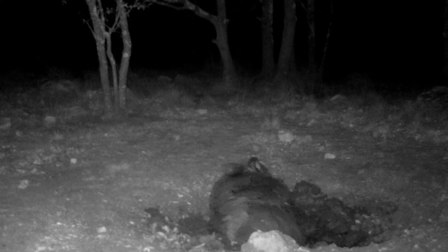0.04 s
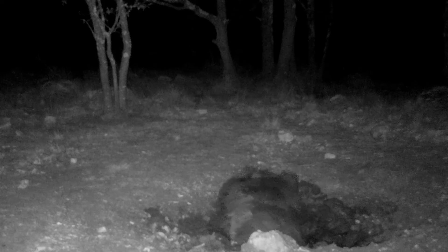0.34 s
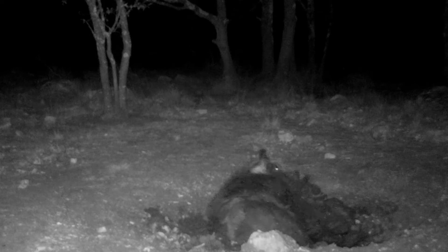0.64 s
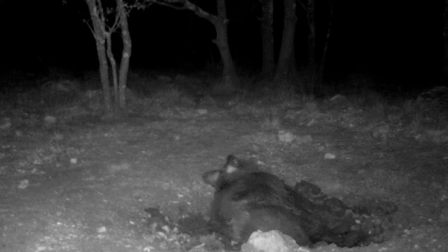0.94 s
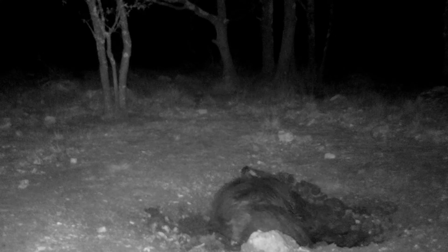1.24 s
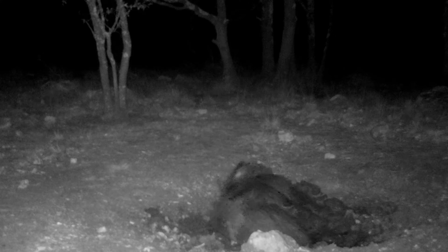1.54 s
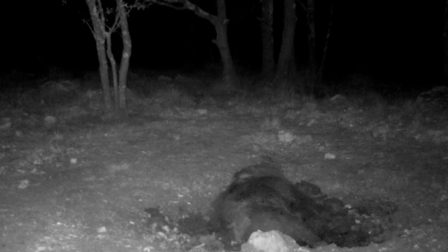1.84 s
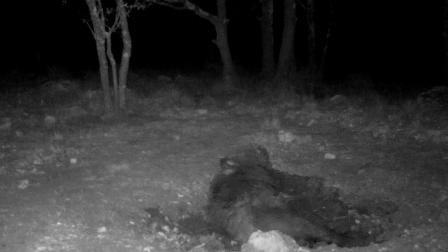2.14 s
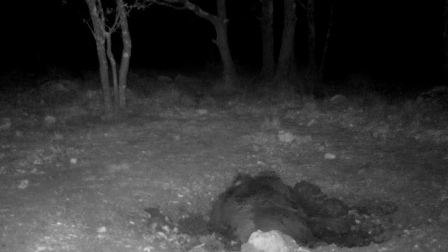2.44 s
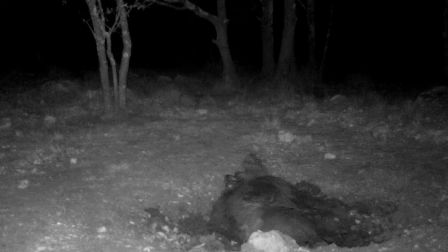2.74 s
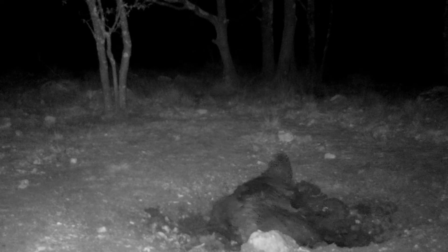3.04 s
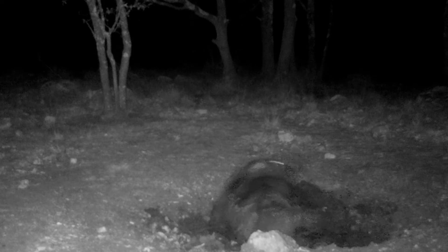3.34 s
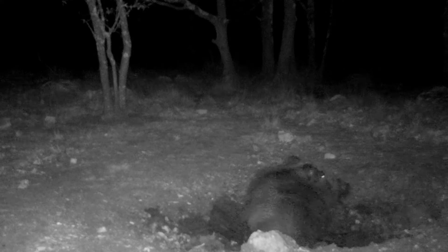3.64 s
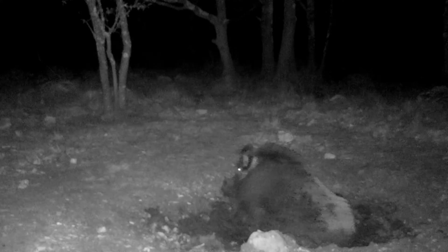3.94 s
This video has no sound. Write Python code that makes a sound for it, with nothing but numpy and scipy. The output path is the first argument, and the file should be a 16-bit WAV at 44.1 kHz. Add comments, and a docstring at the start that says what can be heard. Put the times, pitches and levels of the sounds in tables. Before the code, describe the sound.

Wet mud squelches and smacks as a wild boar rolls in it, over steady hiss.

```python
"""A clearing at night: a wild boar rolls in a mud wallow, a few metres from a trail camera.
Its flank rubs through the mud in small jerks, and each push squeezes out a squelch of tiny air
pockets that burst as damped resonators. Suction lets go in sharp smacks and bubbles plop, over a
faint low rumble. The camera hisses, whines and stops just before the end."""
import sys
import numpy as np
from scipy import signal
from scipy.fft import rfft, irfft, next_fast_len
from scipy.io import wavfile
from scipy.ndimage import map_coordinates

SR = 44100
rng = np.random.default_rng(int(sys.argv[2]) if len(sys.argv) > 2 else 0)


def file_out(sig):
    """Save sig as 16-bit WAV at sys.argv[1]."""
    # one column per channel
    cols = np.atleast_2d(sig).T
    # limit, then scale
    lim = np.clip(cols, -1, 1)
    pcm = np.round(lim * 32767).astype(np.int16)
    wavfile.write(sys.argv[1], SR, pcm)


N = 176400
T = np.arange(N) / SR
OPEN_CYCLES = .38  # time constant of a cavity's onset, in periods


def amp(db):
    """Amplitude ratio of a level in decibels."""
    return 10 ** (np.asarray(db) / 20)


def unit(x):
    """Normalisation to rms 1."""
    return x / np.sqrt(np.mean(x ** 2) + 1e-20)


def add(track, start_s, sound):
    """Superposition of a sound on a track."""
    i = max(0, round(start_s * SR))
    track[i:i + len(sound)] += sound[:max(0, N - i)]


def colour(x, points):
    """Minimum-phase filtering through (frequency [Hz], gain [dB]) points."""
    m = 2 * next_fast_len(N)
    hz, db = np.transpose(points)
    gain = amp(np.interp(np.log(np.fft.rfftfreq(m, 1 / SR) + 1), np.log(hz), db))
    cepstrum = irfft(np.log(gain + 1e-6))
    cepstrum[1:m // 2] *= 2
    cepstrum[m // 2 + 1:] = 0
    return irfft(rfft(x, m) * np.exp(rfft(cepstrum)))[:N]


def wobble(knots_per_s):
    """Smooth random modulation by spline interpolation."""
    return map_coordinates(rng.standard_normal(int(N * knots_per_s / SR) + 4), [T * knots_per_s])


def band_noise(n, low_hz, high_hz):
    """Band-limited Gaussian noise of rms 1."""
    bandpass = signal.butter(2, [low_hz, min(high_hz, .45 * SR)], 'band', fs=SR)
    return unit(signal.lfilter(*bandpass, rng.standard_normal(n)))


def pockets(n, per_s, hz, spread, cycles, scatter_db):
    """Shot noise of rms 1: air pockets burst at random, each a damped resonator of its own pitch."""
    when, size, pitch, life = rng.random((int(per_s * n / SR) + 2, 4)).T
    ring_hz = np.clip(hz * np.exp(spread * np.log(pitch / (1 - pitch)) / 2), 200, 13000)[:, None]
    k = np.arange(SR // 70)
    turns = ring_hz * k / SR
    decay = amp(-60 * turns / (cycles * (.5 + life[:, None])))
    onset = 1 - np.exp(-turns / OPEN_CYCLES)
    strength = amp(-scatter_db * np.log(1 - .96 * size))[:, None] * np.sqrt(np.minimum(ring_hz / hz, 1))
    rings = strength * onset * decay * np.sin(2 * np.pi * turns)
    samples = (when * n).astype(int)[:, None] + k
    return unit(np.bincount(samples.ravel(), rings.ravel(), n)[:n])


# Envelope of the flank's friction: (time [s], relative level [dB])
RUB_ENVELOPE = [(0, -61), (.22, -56), (.3, -55.5), (.44, -51), (.52, -55), (.59, -60), (.64, -53.5),
                (.74, -53.5), (.81, -58), (.97, -63.5), (1.06, -54.5), (1.16, -64), (1.26, -59),
                (1.34, -52.5), (1.42, -58), (1.5, -56), (1.62, -51), (1.68, -52), (1.77, -47.5),
                (1.85, -58), (1.93, -46), (2.07, -54), (2.18, -49.5), (2.26, -49.5), (2.34, -53),
                (2.43, -55.5), (2.5, -61), (2.74, -56), (2.8, -60.5), (2.89, -53), (2.96, -63.5),
                (3.09, -61), (3.15, -50), (3.19, -57), (3.23, -46), (3.36, -48), (3.4, -50), (3.46, -48),
                (3.5, -38.5), (3.72, -42.5), (3.83, -53)]
# Spectrum of the smearing mud: (frequency [Hz], relative level [dB])
SMEAR_SPECTRUM = [(60, -12.5), (180, -13), (350, -6), (550, -0.5), (800, -8), (1400, 5), (2200, 1.5),
                  (3200, -4), (4500, -1.5), (7000, -15.5), (16000, -21)]
def rubbing():
    """Friction noise: bristles jerk through wet mud, tearing pockets open and stirring the puddle."""
    level_db = np.interp(T, *np.transpose(RUB_ENVELOPE)) + 2 * wobble(knots_per_s=55)
    smear = amp(-2.5) * unit(colour(rng.standard_normal(N), SMEAR_SPECTRUM))
    crackle = amp(-3.5) * pockets(N, per_s=1100, hz=1819, spread=.602, cycles=12.3, scatter_db=3)
    sticky_pops = amp(-4.5) * pockets(N, per_s=90, hz=2100, spread=.45, cycles=14, scatter_db=2.5)
    gurgles = amp(-9.5) * pockets(N, per_s=70, hz=803, spread=.45, cycles=20.7, scatter_db=2.5)
    droplets = amp(-18.5) * pockets(N, per_s=300, hz=9000, spread=.2, cycles=4, scatter_db=6)
    return amp(level_db) * (smear + crackle + sticky_pops + gurgles + droplets)


# Envelope of the rumble: (time [s], level [dB])
RUMBLE_ENVELOPE = [(0, -59), (.4, -59), (1, -69.5), (3.8, -71.5)]
def rumble():
    """Low-frequency band noise, faint from the start and fainter after the first second."""
    return amp(np.interp(T, *np.transpose(RUMBLE_ENVELOPE))) * band_noise(N, 55, 130)


# Spectrum of the camera's noise floor: (frequency [Hz], relative level [dB])
HISS_SPECTRUM = [(25, -22), (50, -5.5), (100, -4), (200, -4), (400, -1), (800, 0.5), (1300, 0),
                 (2000, -2.5), (3200, -8), (4100, -13), (4500, -18), (5100, -28.5), (5700, -30),
                 (6500, -31.5), (7700, -32.5), (9000, -40), (12000, -40), (15500, -37)]
def hiss():
    """Self-noise: the camera adds a stationary broadband hiss."""
    return amp(-57.5) * unit(colour(rng.standard_normal(N), HISS_SPECTRUM))


def whine(hz=7796.2, frame_hz=29.75, jump_rad=2.8):
    """Square-wave modulation: the camera's electronic tone flips in phase and level twice a frame."""
    second_half = (T * frame_hz) % 1 > .5
    phase = 2 * np.pi * hz * T
    fundamental = amp(-72.5 - 5 * second_half) * np.sin(phase + jump_rad * second_half)
    return fundamental + amp(-97.5) * np.sin(2 * phase)


# Releases of suction: (time [s], relative level [dB], frequency [Hz], 60 dB decay [cycles])
SUCTION_RELEASES = [(.0625, -30.5, 2220, 11), (.097, -35, 3200, 6), (.252, -44, 2950, 15),
                    (0.2744, -36, 3200, 20), (.701, -38, 2670, 24), (.721, -33.5, 900, 2),
                    (.961, -38.5, 3930, 28), (1.0771, -36, 1520, 12), (1.2802, -29, 1550, 18),
                    (1.285, -32, 1880, 26), (1.3221, -29.5, 2150, 6), (1.5208, -20.5, 2500, 4),
                    (1.5246, -26, 2780, 5), (1.611, -36, 2140, 5), (1.734, -27.5, 1610, 1),
                    (1.766, -35.5, 1870, 4), (1.938, -26, 1480, 8), (1.9828, -25.5, 1100, 2.5),
                    (2.032, -30, 1330, 8), (2.12, -31, 710, 7), (2.221, -33, 1500, 9),
                    (2.234, -33.5, 3100, 6), (2.3482, -27, 1940, 19), (2.3529, -27, 2400, 22),
                    (2.4335, -30.5, 3640, 14), (2.6602, -33, 2700, 38), (2.676, -36.5, 895, 3.5),
                    (3.075, -36.5, 1830, 8), (3.095, -29.5, 1820, 11), (3.216, -35, 1560, 2),
                    (3.2741, -25.5, 1510, 4), (3.475, -19, 2350, 3.5), (3.4831, -13.5, 2750, 5),
                    (3.571, -21, 1800, 10), (3.634, -28, 1500, 5.5)]
def smacks(snap_t60_s=.00073, spray_t60_s=.016):
    """Impulse excitation: a mud film snaps, the cavity behind it rings briefly and droplets spray."""
    out, t = np.zeros(N), np.arange(SR // 20) / SR
    for start_s, db, hz, cycles in SUCTION_RELEASES:
        onset = 1 - np.exp(-hz * t / OPEN_CYCLES)
        ring = onset * amp(-60 * hz * t / cycles) * np.sin(2 * np.pi * hz * t)
        ring /= np.abs(ring).max()
        snap = np.sin(2 * np.pi * 2900 * t) * amp(-60 * t / snap_t60_s)
        spray = band_noise(len(t), hz * .5, hz * 1.64) * amp(-60 * t / spray_t60_s)
        add(out, start_s, amp(db - 2) * (ring + amp(-12) * snap + amp(-10.5) * spray))
    return out


# Pushes into the mud:
# (centre time [s], half duration [s], level [dB], frequency [Hz], relative spray level [dB])
PUSHES = [(.295, 0.019, -47.5, 3160, -20), (.42, 0.062, -57.5, 2180, 0), (0.643, .04, -53, 2980, -4),
          (0.854, 0.023, -45, 2960, -11), (1.531, 0.012, -47, 2780, -8), (1.614, 0.016, -41.5, 1810, -18),
          (1.633, .012, -47.5, 2490, -8), (1.767, .012, -42.5, 2240, -23), (1.797, .012, -45, 1710, -12),
          (1.943, .026, -41, 1286, -18), (2.043, 0.015, -45.5, 1600, -24), (2.13, 0.032, -39, 963, -31),
          (2.221, 0.028, -51, 2520, -2), (2.257, 0.016, -44.5, 1340, -14), (2.353, 0.0066, -37.5, 994, -21),
          (2.408, 0.014, -44.5, 2220, -29), (2.432, 0.018, -50, 3600, -21), (2.664, 0.02, -43.5, 2720, -11),
          (2.886, .04, -54.5, 1830, -16), (3.221, .02, -43, 1830, -26), (3.343, 0.0088, -40.5, 1900, -8),
          (3.371, 0.015, -39.5, 2260, -15.5), (3.488, .02, -30.5, 1900, -11),
          (3.507, 0.013, -33, 1890, -28.5), (3.525, 0.01, -34.5, 1570, -28.5),
          (3.572, 0.019, -31, 1820, -12.5), (3.601, .02, -35.5, 2080, -13.5), (3.641, .016, -35, 1390, -17),
          (3.688, .02, -31.5, 1760, -15), (3.704, 0.0092, -32.5, 1200, -20), (3.725, 0.015, -45, 1905, -20),
          (3.755, .016, -43, 1500, -19.5)]
def squelches():
    """Incoherent summation: bursting pockets, a wet rush and fine spray swell and fade with each push."""
    out = np.zeros(N)
    for centre_s, half_s, db, hz, spray_db in PUSHES:
        n = int(2 * half_s * SR)
        cloud = pockets(n, per_s=1200, hz=hz, spread=.42, cycles=15, scatter_db=3)
        rush = amp(-7.5) * band_noise(n, hz * .29, hz * 2.7)
        spray = amp(spray_db) * pockets(n, per_s=3500, hz=9000, spread=.2, cycles=5.3, scatter_db=1)
        add(out, centre_s - half_s, amp(db) * np.hanning(n) * (cloud + rush + spray))
    return out


# Single bubbles: (time [s], level [dB], initial frequency [Hz], 60 dB decay [initial periods])
BUBBLES = [(.333, -40.5, 580, 24), (.391, -41.5, 693, 27), (.742, -37.5, 854, 23), (0.903, -36.5, 1130, 23),
           (1.696, -32, 1370, 25), (2.032, -39, 1234, 75), (2.087, -38, 920, 46), (2.12, -37, 540, 20),
           (2.126, -31, 780, 11), (2.134, -33.5, 1060, 26), (2.255, -41, 1360, 22), (2.351, -44, 730, 12),
           (3.273, -26, 1220, 28), (3.351, -29.5, 1270, 28), (3.445, -30.5, 1500, 22.5),
           (3.632, -23.5, 483, 12.5), (3.646, -38.5, 525, 22.5), (3.679, -34, 480, 20),
           (3.694, -37, 439, 15), (3.796, -35, 486.5, 21), (3.815, -40, 2680, 175),
           (3.817, -37.5, 1255, 30)]
def plops(attack_s=.00082, glide=.14):
    """Bubble resonance: each damped oscillation rises in pitch as the bubble opens."""
    out, t = np.zeros(N), np.arange(SR // 12) / SR
    for start_s, db, hz, cycles in BUBBLES:
        age = hz * t / cycles
        envelope = amp(db - 60 * age) * (1 - np.exp(-t / attack_s))
        add(out, start_s, envelope * np.sin(2 * np.pi * hz * t * (1 + glide * age)))
    return out


def clearing(x, t60_s=.16):
    """Scattering: the ground and trunks add a faint, exponentially decaying tail."""
    t = np.arange(SR // 3) / SR
    tail = rng.standard_normal(len(t)) * amp(-60 * t / t60_s) * (t > .003)
    return x + amp(-12) * signal.fftconvolve(x, tail / np.linalg.norm(tail))[:N]


def scene():
    """Superposition of the mud sounds, their scatter and the rumble, in one channel."""
    mud = rubbing() + squelches() + smacks() + plops()
    return (clearing(mud) + rumble())[None]


# Frequency response of the small, dull microphone: (frequency [Hz], gain [dB])
MICROPHONE_RESPONSE = [(30, -28), (150, -10), (260, -3), (500, -0.5), (740, -2.5), (1300, -1.5), (2300, -1),
                       (3700, 2), (4300, -2), (4900, -17), (5600, -26), (6500, -12), (7600, -21),
                       (9300, -24.5), (11000, -22.5), (13000, -33), (16000, -49)]
def record(dry):
    """Transduction: the microphone filters the sound; the camera adds noise, stops and cuts the treble."""
    stop_s, top_hz = 3.832, 15750
    x = (colour(dry[0], MICROPHONE_RESPONSE) + hiss() + whine()) * (T < stop_s)
    passband = np.fft.rfftfreq(N, 1 / SR) < top_hz
    return irfft(rfft(x) * passband, N)[None]


dry = scene()
out = record(dry)
file_out(out)
```